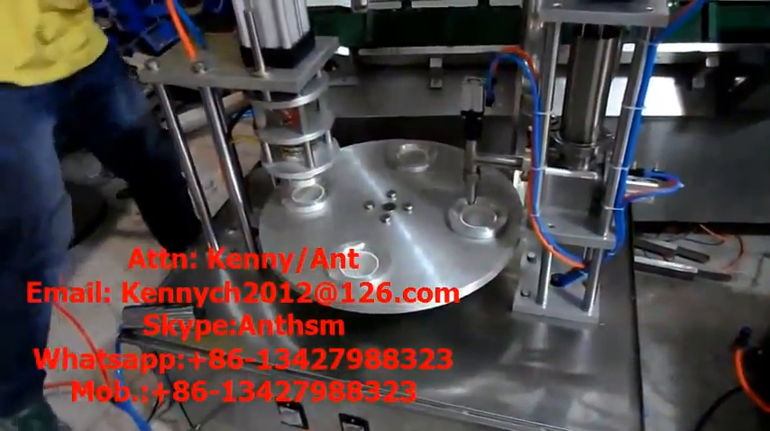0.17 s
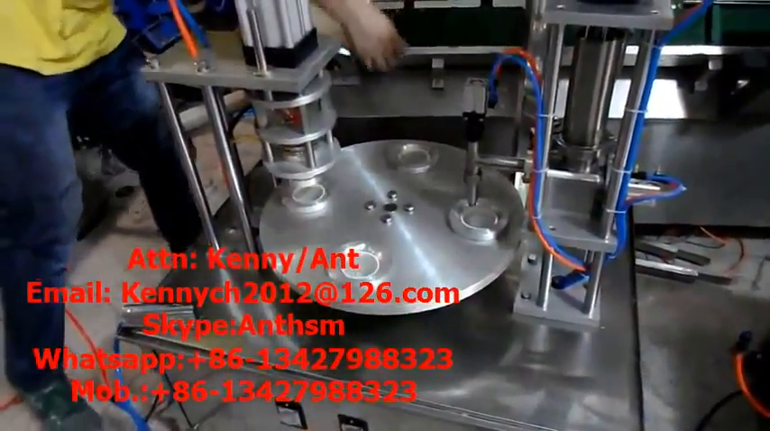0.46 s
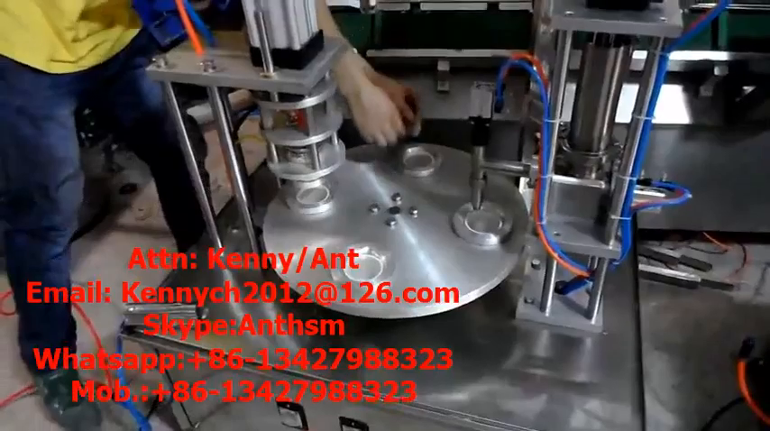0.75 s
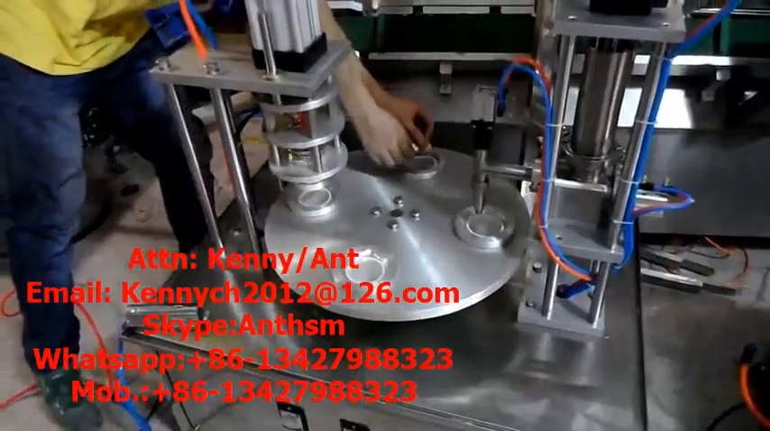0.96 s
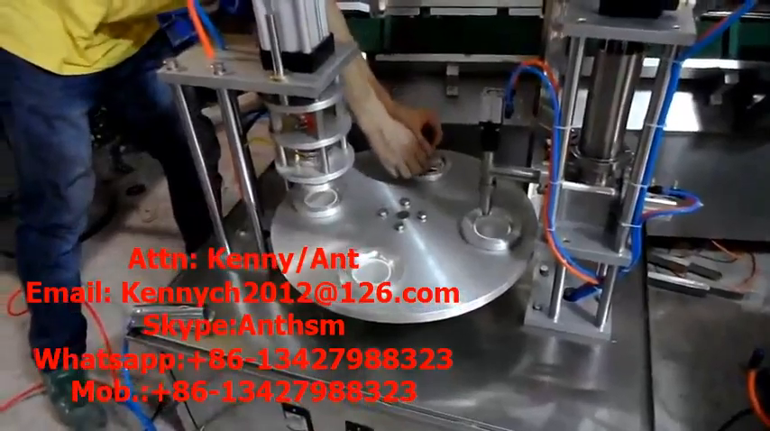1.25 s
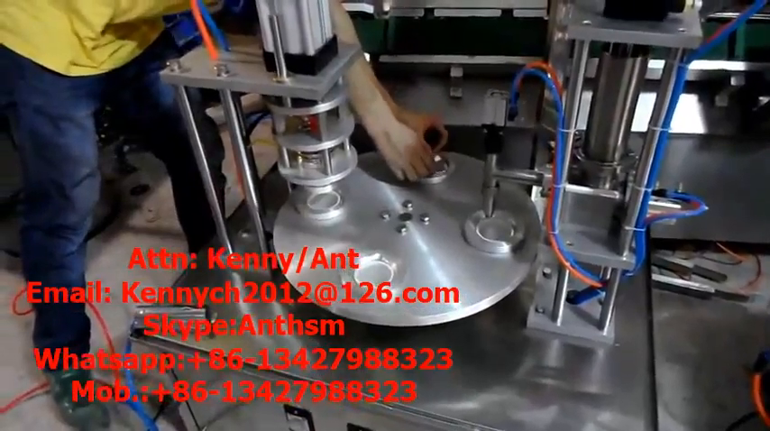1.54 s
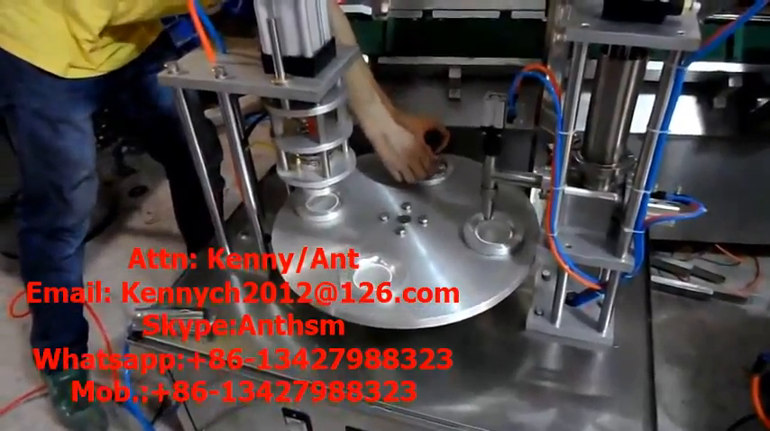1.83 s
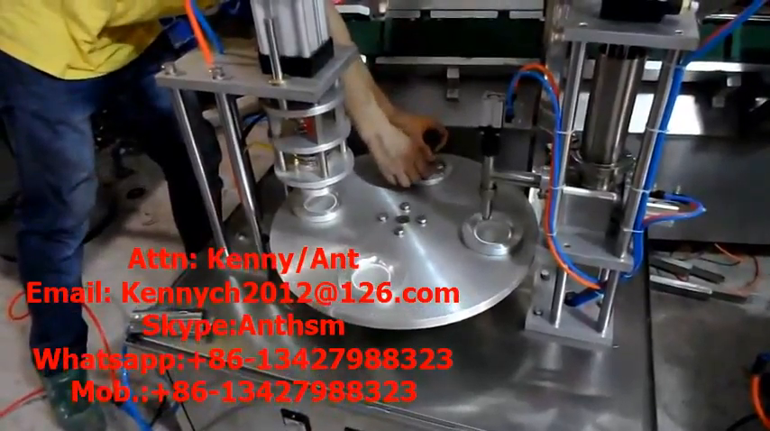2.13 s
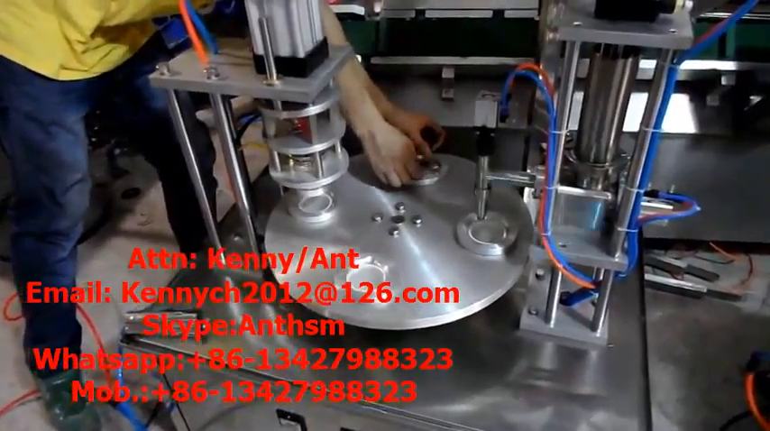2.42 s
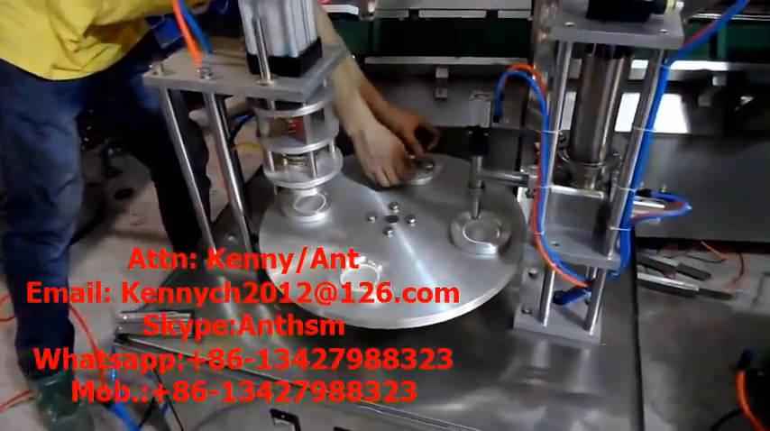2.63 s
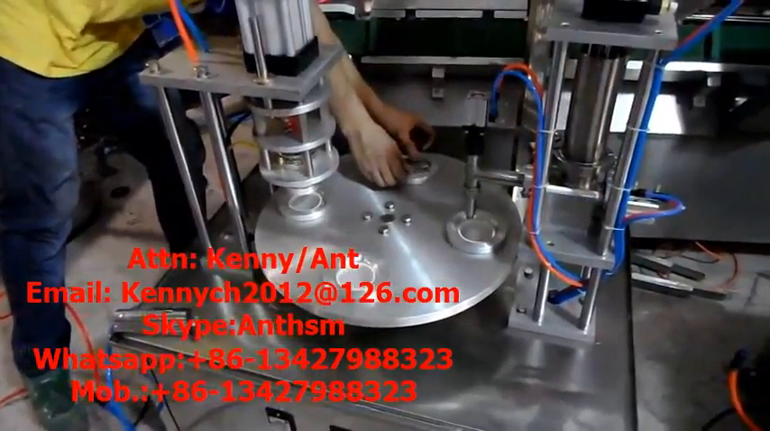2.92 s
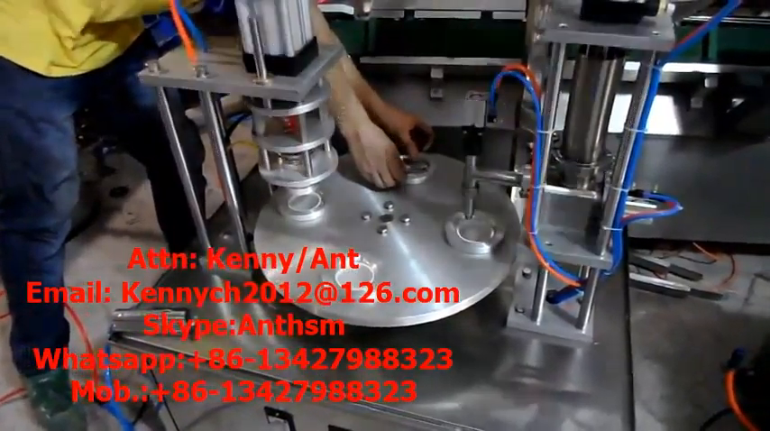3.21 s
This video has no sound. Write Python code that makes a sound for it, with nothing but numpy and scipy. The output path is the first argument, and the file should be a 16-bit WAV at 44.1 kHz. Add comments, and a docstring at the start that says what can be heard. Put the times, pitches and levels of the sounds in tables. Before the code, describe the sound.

A pneumatic packing machine puffs compressed air over a steady whining motor roar in a workshop

```python
"""A pneumatic packing machine in a big workshop. Throughout, far motors roar as patchy noise with fuzzy
lines, and whine as tones of a 400 Hz series. A steel plate clinks at once (narrow noise per mode), then dull
thuds knock nearby (damped tones in noise). At 0.4 s a valve blows a puff of shaped noise and pipes sing; from
1.1 s a second blows and its jet stays open, as steel clanks across the hall. Near 3 s a rod clinks."""
import sys
import numpy as np
from scipy import signal
from scipy.fft import rfft, irfft, next_fast_len
from scipy.io import wavfile
from scipy.ndimage import uniform_filter1d, map_coordinates

SR = 44100
rng = np.random.default_rng(int(sys.argv[2]) if len(sys.argv) > 2 else 0)


def invert_db(x):
    """Field ratio 10**(x/20) for x, a level in decibels (scalar or array-like)."""
    u = np.asarray(x, float) / 20
    return 10 ** u


def store_pcm(level_fs):
    """Save levels as 16-bit WAV."""
    pcm = np.round(np.clip(level_fs, -1, 1) * 32767).astype(np.int16)
    wavfile.write(sys.argv[1], SR, np.atleast_2d(pcm).T)


N = 148176  # length in samples

# Spectrum of the hall's roar. Each row: frequency in Hz, relative density in dB per Hz.
HALL_SPECTRUM = [(12, -60), (22, -20.5), (60, -24), (105, -19), (150, -15.5), (250, -13.5), (400, -12),
                 (600, -15), (850, -13.5), (1100, -17.5), (2000, -20.5), (3000, -25), (4300, -29),
                 (5500, -35), (8000, -44), (10500, -44.5), (12000, -57.5), (14000, -100)]
# Loudness of the roar. Each row: time in seconds, rms level in dB.
ROAR_LEVEL = [(0, -26), (.4, -26.5), (.9, -25.5), (1.3, -23), (2.2, -25), (3.36, -23.5)]
# Weaker fuzzy motor lines. Each row: frequency in Hz, rms level in dB at the mean roar level, width in Hz.
MOTOR_LINES = [(131.2, -40.5, 20), (191.2, -39.5, 18), (257.3, -36.5, 7.5), (330, -43, 6.1),
               (1187, -41.5, 3.1), (4050, -49, 12), (4230, -49, 14)]
# Motor whine. Each row: time in seconds, then the rms levels in dB of the 400, 800 and 2000 Hz tones.
WHINE_LEVELS = [(0, -33, -43, -37.5), (0.399, -31.5, -39.5, -49), (.5, -31, -38, -30),
                (.7, -26.5, -38, -28), (.95, -28, -34, -39.5), (1.1, -28.5, -32, -35.5),
                (1.2, -24, -27.5, -30), (1.4, -22.5, -27.5, -31.5), (1.72, -28, -27.5, -31.5),
                (1.79, -28.5, -22, -36), (1.85, -20, -32, -30), (1.93, -35, -26, -36),
                (1.99, -23.5, -26, -25), (2.08, -31, -31.5, -25), (2.28, -21.5, -24, -31),
                (2.36, -34, -40, -35), (2.45, -26.5, -26, -30.5), (2.85, -26.5, -35, -30.5),
                (3.18, -24.5, -33, -33), (3.24, -38, -39, -32.5), (3.3, -18.5, -32, -38),
                (3.36, -57, -21, -26.5)]
# Modes of the plate, then of the rod. Each row: frequency in Hz, rms level in dB, width in Hz, t60 in seconds.
PLATE_MODES = [(4180, -35, 130, 0.54), (6400, -37, 150, .7), (7000, -50, 60, .4), (7370, -34.5, 150, 0.62),
               (8700, -48, 540, 0.59), (9800, -51, 200, .5), (11050, -44, 900, 0.67), (10930, -55, 30, .4)]
ROD_MODES = [(4700, -43, 150, .3), (6340, -45, 70, 0.27), (10400, -69, 60, .2), (10790, -54, 100, .2),
             (11120, -46.5, 100, .2)]
# Dull thuds. Each row: start in seconds, peak level of the tone in dB, frequency in Hz, t60 in seconds.
THUD_KNOCKS = [(.0765, -12.5, 975, 0.016), (.09, -21, 1100, .08), (.169, -18, 900, 0.023),
               (.181, -13, 758, .09), (.19, -16.5, 786, 0.086)]
# Air puffs. Each row: start in seconds, rms level at the peak in dB, rise in seconds, hold in seconds,
# t60 in seconds, frequency in Hz above which it is dull.
AIR_PUFFS = [(0.411, -23.5, 0.029, 0.018, 0.49, 2470), (0.437, -18.5, 0.047, 0.13, 1.2, 12000),
             (1.114, -25, 0.056, .05, 1, 3530), (1.188, -25, 0.026, 0.051, 0.4, 3070)]
# Spectrum of a puff before dulling. Each row: frequency in Hz, relative density in dB per Hz.
PUFF_SPECTRUM = [(200, -24), (450, -0.5), (900, -1.5), (1300, 0), (2260, -4), (3580, -6.5), (5500, -11.5),
                 (8000, -19.5), (10000, -26.5), (11500, -63), (14000, -100)]
# Frame and pipes singing with the first valve, then the second.
# Each row: frequency in Hz, width in Hz, rms level at the peak in dB.
FIRST_PIPES = [(1066, 21, -28), (1248, 20, -31.5), (1430, 27, -28.5), (2584, 13, -34.5), (2960, 32, -35),
               (3190, 25, -36), (3478, 13, -33), (1900, 83, -36)]
SECOND_PIPES = [(1120, 17, -31), (1253, 29, -32.5), (2780, 30, -46)]
# The jet that stays open. Each row: time in seconds, rms level in dB.
JET_LEVEL = [(1.08, -40), (1.16, -25), (1.3, -27), (1.7, -26), (2.0, -24.5), (2.5, -25), (2.8, -25.5),
             (3.36, -27)]
# Spectrum of the jet. Each row: frequency in Hz, relative density in dB per Hz.
JET_SPECTRUM = [(150, -26), (300, -15), (500, -10), (800, -19), (1200, -11.5), (1800, -16), (2300, -14),
                (3100, -22), (4300, -22.5), (5500, -33.5), (8000, -36.5), (10500, -45), (12000, -48),
                (14000, -100)]
# Short far clanks as the cylinder moves. Each row: start in seconds, rms level in dB, frequency in Hz,
# width in Hz, t60 in seconds.
FAR_CLANKS = [(1.13, -33, 3220, 400, .25), (1.183, -27.5, 3280, 350, 0.23), (1.186, -31, 3980, 300, .2),
              (1.21, -31, 3700, 400, 0.32), (1.215, -21.5, 2150, 120, 0.24)]


def unit(x):
    """Normalization: scale to rms 1."""
    return x / np.sqrt(np.mean(x ** 2) + 1e-20)


def curves(rows):
    """Linear interpolation: one value per sample for each column after the time."""
    times, *columns = np.transpose(rows)
    return [np.interp(np.arange(N) / SR, times, column) for column in columns]


def wobble(rate):
    """Random modulation: a smooth curve through random knots, rate knots a second."""
    knots = rng.standard_normal(N // 100)
    return map_coordinates(knots, [np.arange(N) * rate / SR])


def noise(gain, patchy_db=0):
    """Filtered noise: rms 1, spectrum gain(Hz), in time-frequency patches of random level."""
    grains = signal.stft(rng.standard_normal(N + 4096), nperseg=512)[2]
    field = uniform_filter1d(rng.standard_normal(grains.shape), size=5, axis=0)
    field = uniform_filter1d(field, size=10, axis=1)
    patchy = signal.istft(grains * invert_db(patchy_db * unit(field)), nperseg=512)[1]
    size = next_fast_len(len(patchy))
    spectrum = rfft(patchy, size) * gain(np.fft.rfftfreq(size, 1 / SR))
    return unit(irfft(spectrum, size)[:N])


def colour(points):
    """Spectral envelope: gain from (Hz, dB) points on a log axis, nearly silent outside them."""
    f, db = np.transpose(points)
    return lambda hz: invert_db(np.interp(np.log(hz + 1), np.log(f + 1), db, left=-120, right=-120))


def narrow(hz, width_hz):
    """Resonance: noise of rms 1 in one narrow peak, its width taken at half amplitude."""
    f = np.fft.rfftfreq(N, 1 / SR)
    real, imaginary = rng.standard_normal((2, len(f)))
    return unit(irfft((real + 1j * imaginary) / (1 + (2 * (f - hz) / width_hz) ** 2), N))


def swell(start, rise, hold, t60):
    """Exponential decay: a smooth rise and a hold, then a fall of 60 dB in each t60."""
    t = np.arange(N) / SR - start
    up = np.clip(t / rise, 0, 1)
    smooth_rise = up * up * (3 - 2 * up)
    return smooth_rise * np.exp(-np.log(1000) * np.clip(t - rise - hold, 0, None) / t60)


def hall():
    """Superposition of far machines: broadband roar, and fuzzy lines that follow its level."""
    level_db, = curves(ROAR_LEVEL)
    lines = sum(invert_db(db) * narrow(hz, width) for hz, db, width in MOTOR_LINES)
    lift = invert_db(level_db - level_db.mean())
    roar_gain = invert_db(level_db + 0.46 * wobble(5.1))
    return roar_gain * noise(colour(HALL_SPECTRUM), patchy_db=1.0) + lift * lines


def whine():
    """Harmonics of rotating motors: sine tones, partly smeared into narrow noise by the hall."""
    t = np.arange(N) / SR
    smear_hz, noisy_share = (30, 40, 45), (.2, .5, .5)  # line widths, shares of power
    total = 0
    for hz, db, width, share in zip((400, 800, 2000), curves(WHINE_LEVELS), smear_hz, noisy_share):
        tone = np.sqrt(2 * (1 - share)) * np.sin(2 * np.pi * (hz * t + rng.random()))
        smear = np.sqrt(share) * narrow(hz, width)
        total = total + invert_db(db) * (tone + smear)
    return total


def clinks():
    """Modal vibration: each mode is fluttering narrow noise that builds up and dies with the hall."""
    rise_s = 0.024
    total = 0
    for start_s, hold_s, modes in ((0.023, 0.022, PLATE_MODES), (3.04, 0.068, ROD_MODES)):
        for hz, db, width, t60 in modes:
            total = total + invert_db(db) * narrow(hz, width) * swell(start_s, rise_s, hold_s, t60)
    return total


def thuds():
    """Damped oscillation: soft knocks, each a short tone in a puff of dull noise."""
    t = np.arange(N) / SR
    dull = invert_db(-8) * narrow(1030, 1000)
    rise_s, hold_s = 0.0021, 0.0019
    total = 0
    for start, db, hz, t60 in THUD_KNOCKS:
        tone = np.sin(2 * np.pi * hz * (t - start))
        total = total + invert_db(db) * swell(start, rise_s, hold_s, t60) * (tone + dull)
    return total


def puff(start, db, rise, hold, t60, dull_hz, pipes):
    """Turbulent noise exciting resonances: a blow of air and singing pipes; the air's treble fades first."""
    split_hz, treble_share = 3600, 0.62  # the treble holds and dies in this share of the time
    rush = noise(lambda hz: colour(PUFF_SPECTRUM)(hz) / np.sqrt(1 + (hz / dull_hz) ** 4), patchy_db=1.5)
    low = signal.sosfiltfilt(signal.butter(2, split_hz, fs=SR, output="sos"), rush)
    high = rush - low
    singing = sum(invert_db(level) * narrow(hz, width) for hz, width, level in pipes)
    treble_swell = swell(start, rise, hold * treble_share, t60 * treble_share)
    return swell(start, rise, hold, t60) * (invert_db(db) * low + singing) + treble_swell * invert_db(db) * high


def air():
    """Turbulent jet noise: a valve creeps open and blows, another blows, and its jet stays open."""
    pipes_per_puff = ([], FIRST_PIPES, [], SECOND_PIPES)
    puffs = sum(puff(*row, pipes) for row, pipes in zip(AIR_PUFFS, pipes_per_puff))
    jet_db, = curves(JET_LEVEL)
    is_open = jet_db > jet_db[0]  # silent until the level leaves its first value
    jet_gain = is_open * invert_db(jet_db + 0.7 * wobble(11))
    return puffs + jet_gain * noise(colour(JET_SPECTRUM), patchy_db=1.5)


def clanks():
    """Reverberant ringing: each clank is a brief band of noise blurred by the hall."""
    rise_s, hold_s = 0.0056, .01
    return sum(invert_db(db) * narrow(hz, width) * swell(start, rise_s, hold_s, t60)
               for start, db, hz, width, t60 in FAR_CLANKS)


def scene():
    """Superposition: the sum of all sources, mono."""
    return (hall() + whine() + clinks() + thuds() + air() + clanks())[None]


def roll_off(x):
    """The treble ends steeply here."""
    return signal.sosfilt(signal.butter(12, 11900, fs=SR, output="sos"), x)


def record(dry):
    """Saturation: the microphone amplifier rounds off its peaks."""
    ceiling, knee = 0.54, 4  # limiting amplitude, sharpness of the bend
    finished = dry / (1 + np.abs(dry / ceiling) ** knee) ** (1 / knee)
    return roll_off(finished)


dry = scene()
out = record(dry)
store_pcm(out)
```